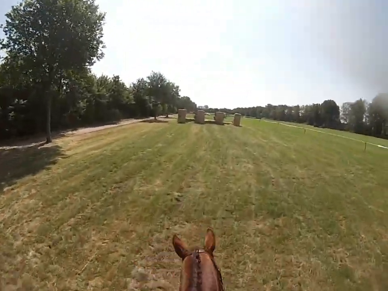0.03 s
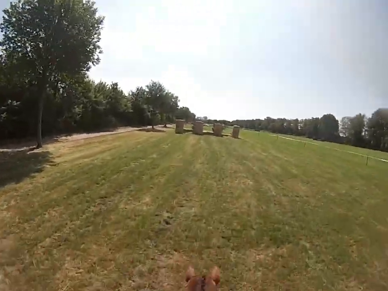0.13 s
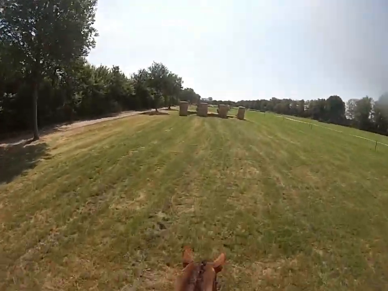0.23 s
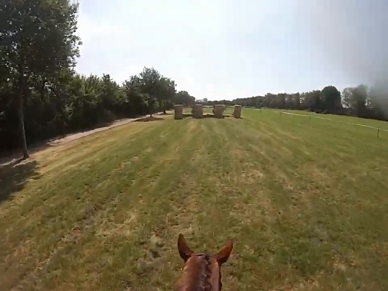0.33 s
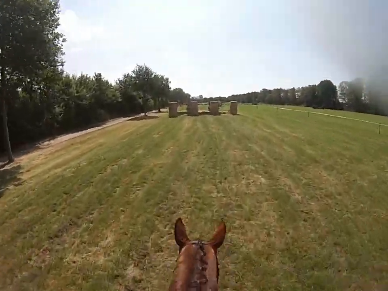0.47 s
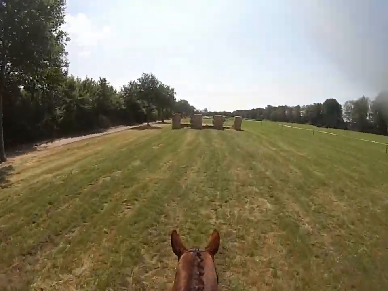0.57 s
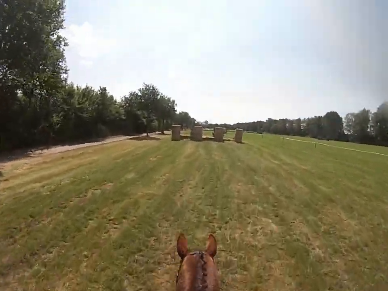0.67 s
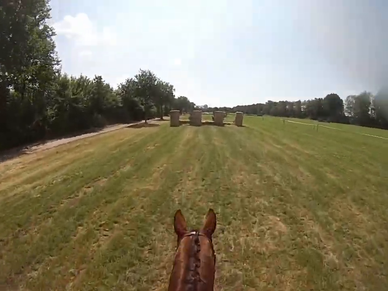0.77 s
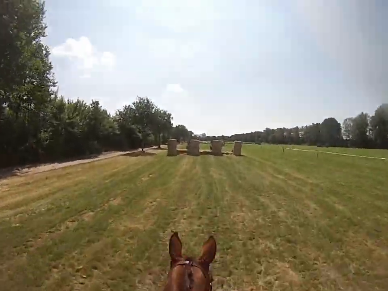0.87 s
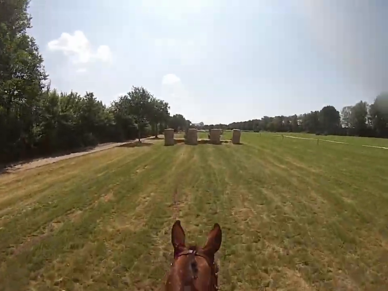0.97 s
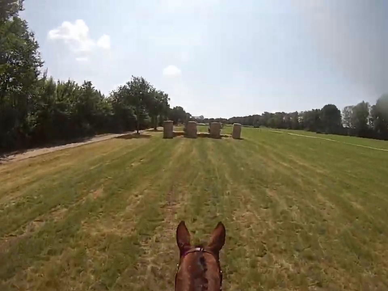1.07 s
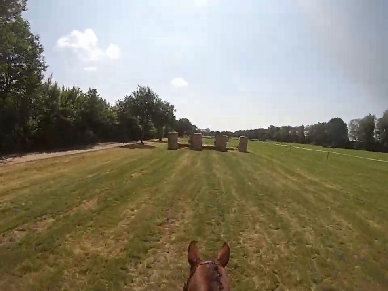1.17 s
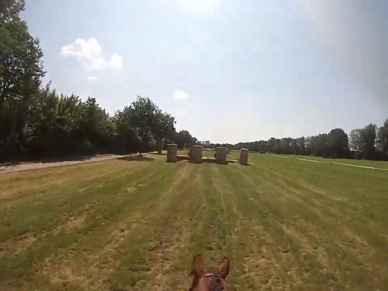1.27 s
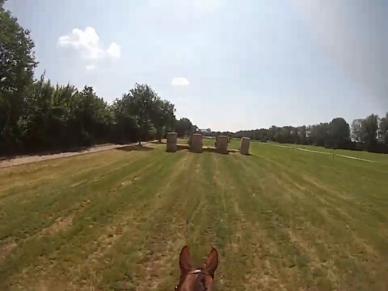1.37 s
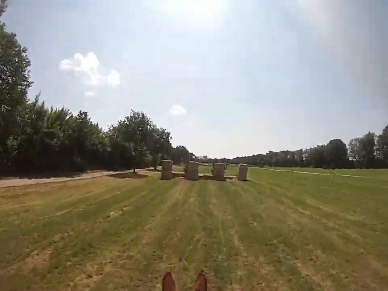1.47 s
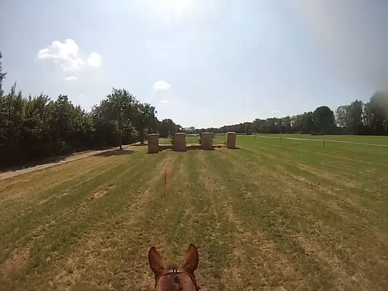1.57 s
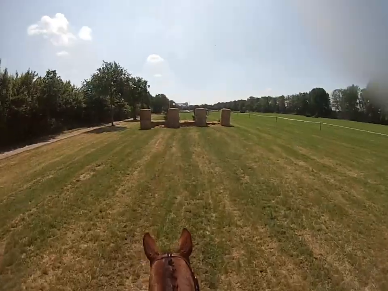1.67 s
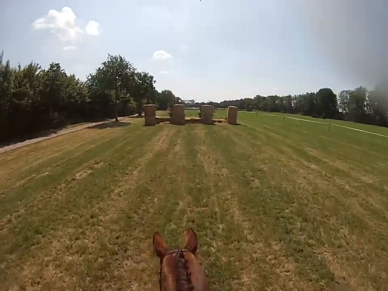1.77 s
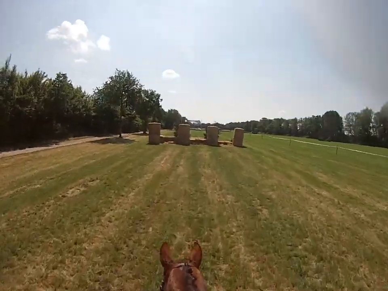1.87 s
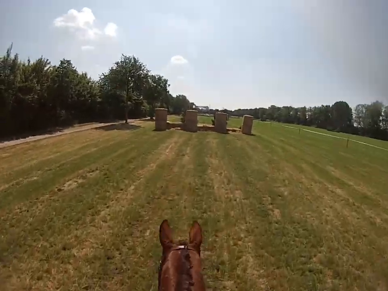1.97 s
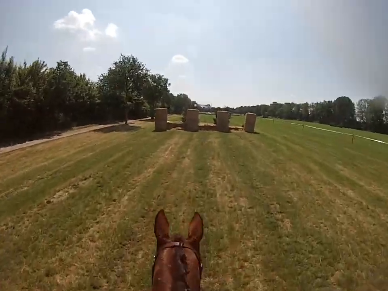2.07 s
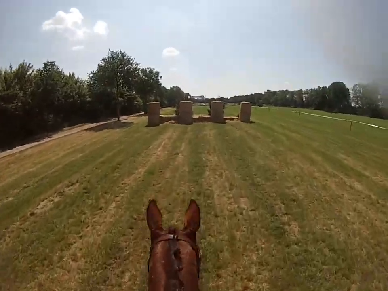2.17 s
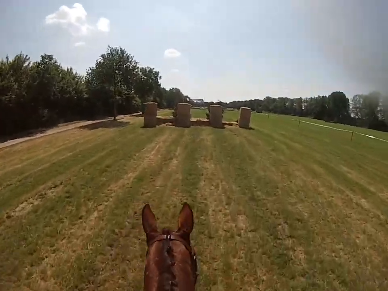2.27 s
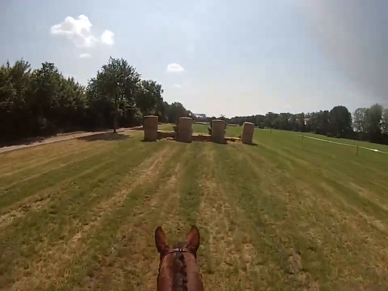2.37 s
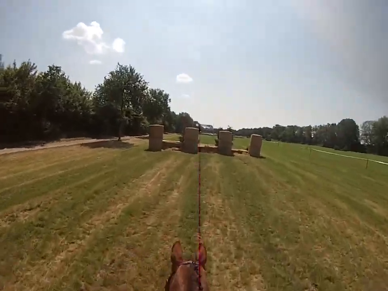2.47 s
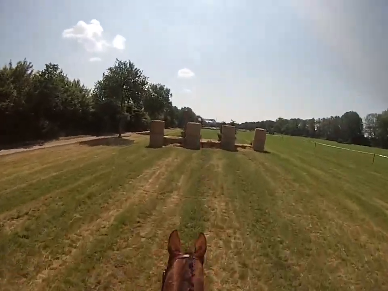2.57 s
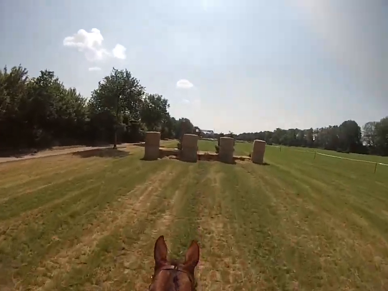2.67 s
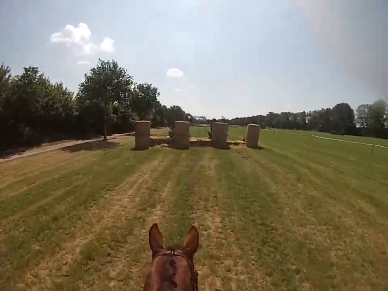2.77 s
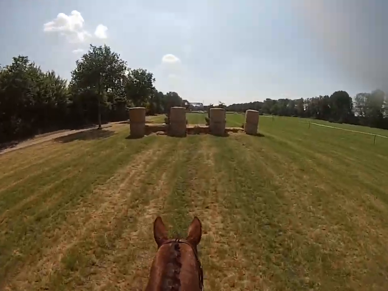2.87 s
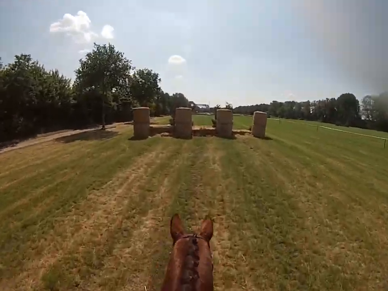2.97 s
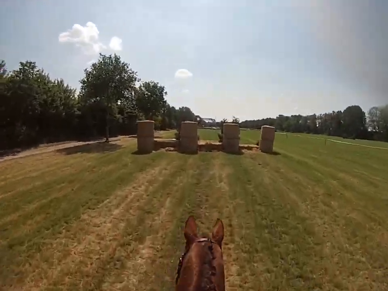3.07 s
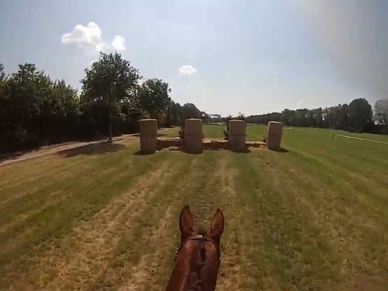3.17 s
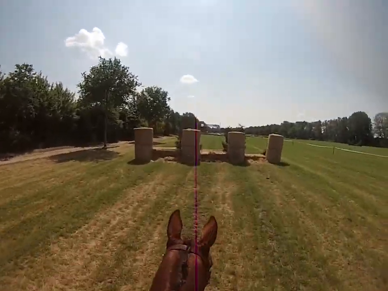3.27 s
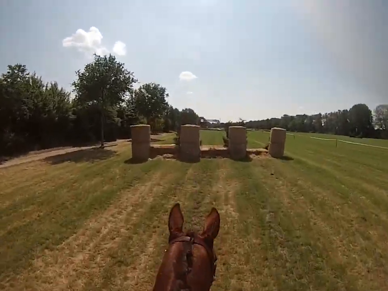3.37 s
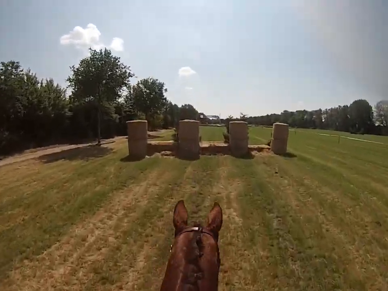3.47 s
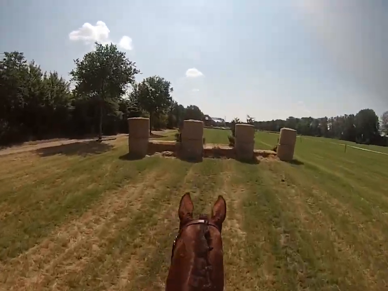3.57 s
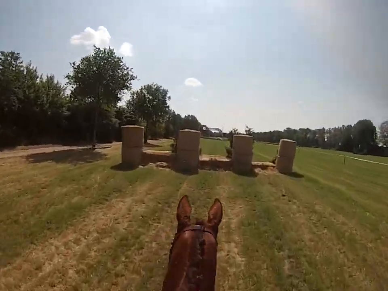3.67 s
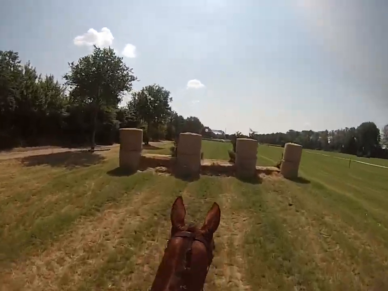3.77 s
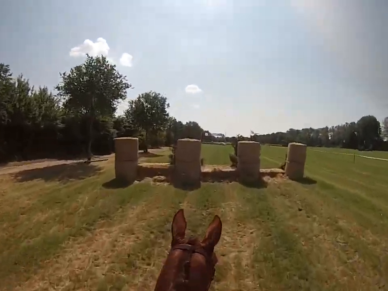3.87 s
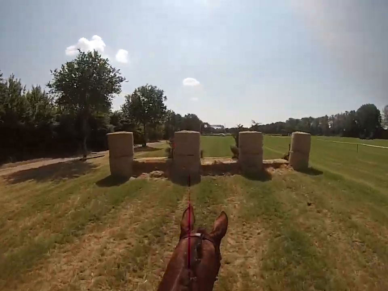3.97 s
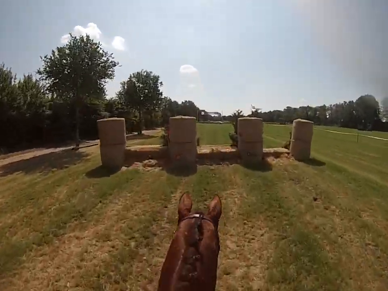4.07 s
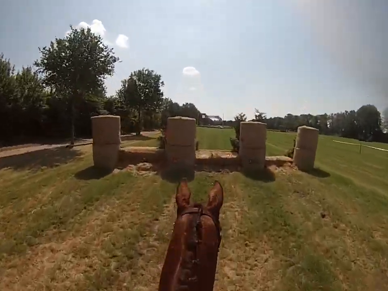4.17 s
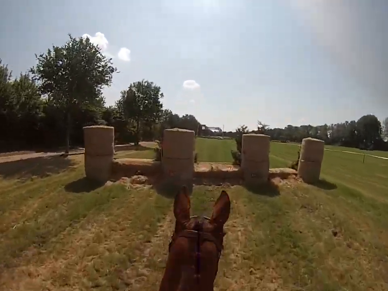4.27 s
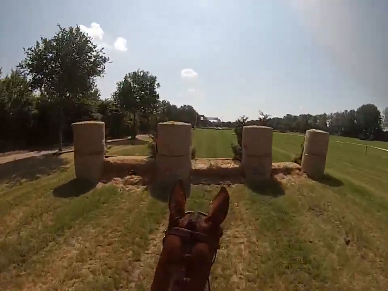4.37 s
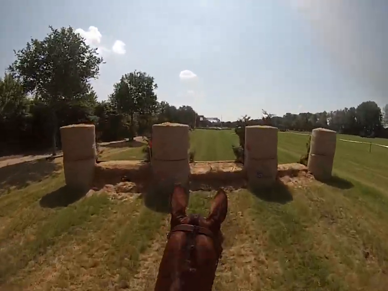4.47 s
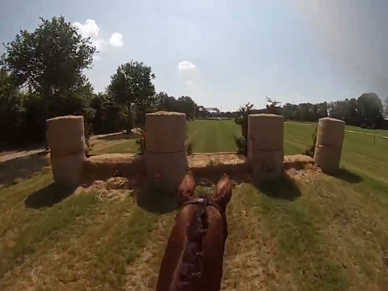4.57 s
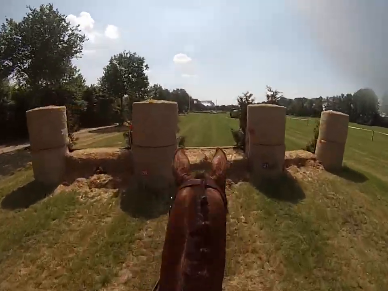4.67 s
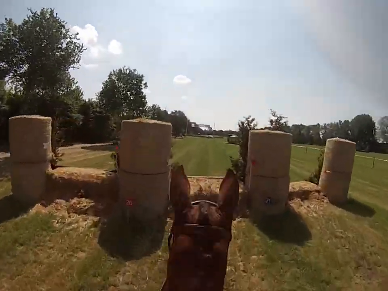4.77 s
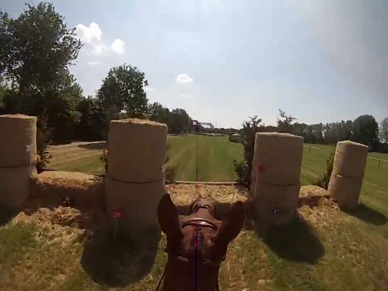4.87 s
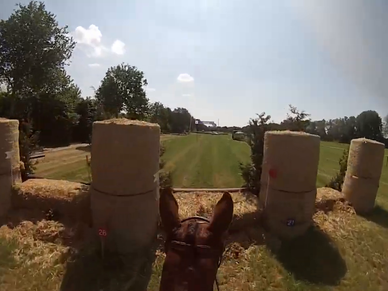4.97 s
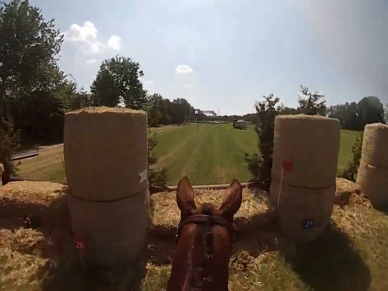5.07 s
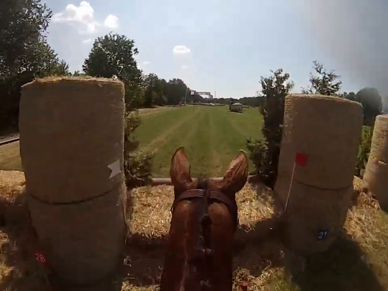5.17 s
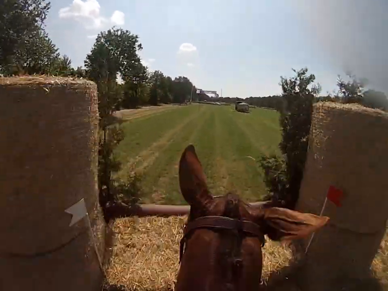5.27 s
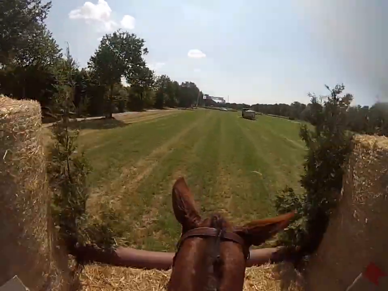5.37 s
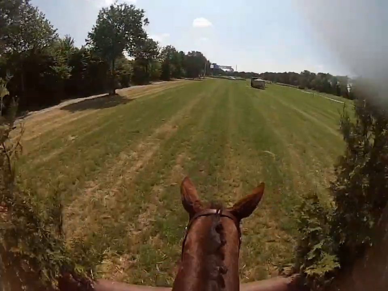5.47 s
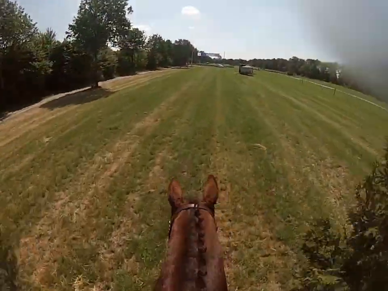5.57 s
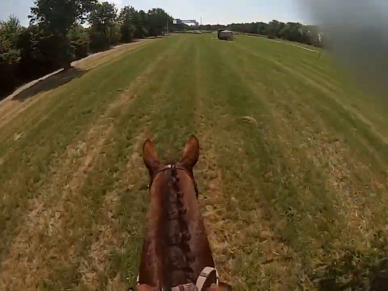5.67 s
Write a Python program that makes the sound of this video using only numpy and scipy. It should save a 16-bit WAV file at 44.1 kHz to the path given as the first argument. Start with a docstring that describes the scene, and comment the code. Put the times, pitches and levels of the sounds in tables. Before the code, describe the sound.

Outdoors on open grass, a cased camera on a rider's helmet hears gusting, slightly boxy wind over faint steady wash. Dull, low hoof thuds and body lurches come in strides about twice a second. Tack scuffs and tiny clicks pass by, a faint knock near 3.75 seconds, then at the straw fence a deep heave with a loud cracking rattle, and a second rattle just after.

```python
"""Air rushes and hisses round a cased camera on the helmet of a rider galloping over grass.
Filtered noise in puffs, gusts and stride swells makes the wind, over a faint even wash.
Hooves and the horse's weight are dull decaying sines; tack scuffs, creaks and clicks.
The camera's mount knocks faintly on the way; at a jump over a straw-bale fence it jolts and
rattles twice, as bursts of crack noise and damped case modes."""
import sys
import numpy as np
from scipy import signal
from scipy.fft import rfft, irfft
from scipy.io import wavfile
from scipy.ndimage import uniform_filter1d

SR = 44100
rng = np.random.default_rng(int(sys.argv[2]) if len(sys.argv) > 2 else 0)


def waveform_to_disk(signal):
    """Save audio, clipped to [-1, 1], as 16-bit WAV at the path in sys.argv[1]."""
    frames = np.transpose(np.atleast_2d(signal))
    scaled = np.clip(frames, -1, 1) * 32767
    samples = np.round(scaled).astype(np.int16)
    wavfile.write(sys.argv[1], SR, samples)


N = 251811
TIME = np.arange(N) / SR
BINS = np.fft.rfftfreq(N, 1 / SR)

# Peaks and dips of the air in the case.
# Each row: frequency in Hz, width in Hz, lift in dB.
CAVITY_RESONANCES = [(1427, 250, 4.5), (1953, 120, 4.5), (2247, 99, -12.5), (2510, 700, 7), (2817, 240, 1),
                     (3104, 104, -8.5), (3457, 830, 6), (3920, 110, -6.5), (4450, 1100, 3.5),
                     (5650, 150, 6.5)]
# Dips and crests of the horse's stride, with the air noise at each.
# Each row: dip in seconds, crest in seconds, buffeting in dB, roar in dB, hiss in dB,
# half-length of the hiss in seconds, whoosh in dB.
STRIDE_CYCLES = [(-.4, 0, -50, -46, -64.5, .06, -60), (.18, .33, -46, -46.5, -67, .13, -59),
                 (.88, 1.08, -47, -46.5, -72, .15, -58), (1.45, 1.648, -43, -44, -51.5, .074, -50.5),
                 (2.0, 2.25, -43, -52, -76, .1, -55.5), (2.58, 2.92, -47, -49, -61.5, .115, -54.5),
                 (3.14, 3.45, -48, -50, -66, .12, -53.5), (3.8, 4.08, -41, -46.5, -70, .13, -53.5),
                 (4.38, 4.62, -42, -45, -61.5, .1, -59), (4.86, 5.09, -37, -42.5, -56.5, .125, -58),
                 (5.36, 5.31, -33, -43, -61, .21, -70)]


def gain_of(db):
    """Decibels to amplitude."""
    return 10 ** (np.asarray(db) / 20)


def evened(x):
    """Scales to an rms of one."""
    return x / np.sqrt(np.mean(x ** 2) + 1e-20)


def add(mix, start_s, sound):
    """Mixes a sound in at start_s, cut at the end of the mix."""
    part = mix[max(round(start_s * SR), 0):][:len(sound)]
    part += sound[:len(part)]


def colour(x, spectrum, lift_db=0):
    """Filters x by a spectrum drawn over log frequency, to an rms of one."""
    hz, db = np.transpose(spectrum)
    shape_db = np.interp(np.log(BINS + 1), np.log(hz), db) + lift_db
    audible = BINS > 10
    return evened(irfft(rfft(x) * gain_of(shape_db) * audible, N))


def wander(rate_hz):
    """Slow random curve of unit rms, up to about rate_hz."""
    lowpass = 1 + (BINS / rate_hz) ** 2
    return evened(irfft(rfft(rng.standard_normal(N)) / lowpass, N))


def turbulence(flutter_db, rate_hz):
    """Noise that comes in puffs as eddies pass; flutter_db is the rms of the level."""
    return rng.standard_normal(N) * gain_of(flutter_db * wander(rate_hz))


def resonance_db(resonances):
    """Sums the peaks and dips of resonances into a response in dB."""
    return sum(db / (1 + (2 * (BINS - hz) / width_hz) ** 2) for hz, width_hz, db in resonances)


def swells(times_s, levels_db, half_lengths_s):
    """Bell-shaped swells whose powers add."""
    bells = np.exp(-((TIME[:, None] - times_s) / half_lengths_s) ** 2)
    return np.linalg.norm(bells * gain_of(levels_db), axis=1)


def gusts():
    """Head wind: each gust rises, holds while its level drifts, and falls away."""
    # Each row: start in seconds, hold in seconds, level in dB, sag in dB per second.
    gust_rows = [(-.1, 0.11, -42, -2), (0.144, 0.73, -44.5, 0), (0.905, 0.33, -36, 20.5),
                 (1.369, 0.37, -53, -24), (1.81, 0.63, -48, 8), (2.593, 0.4, -54.5, -8),
                 (3.23, 0.18, -47.5, 17), (3.47, 0.091, -58, 0), (3.755, 0.18, -52, -34),
                 (4.05, 0.28, -54, -12), (4.326, 0.35, -45, 1.5), (4.85, 0.2, -51, -45),
                 (5.063, .19, -43, 1), (5.255, 0.28, -39.5, 7.5), (5.593, 0.13, -47.5, -2)]
    rise_s, fall_s = 0.064, 0.097
    power = np.zeros(N)
    for start_s, hold_s, db, sag_db_per_s in gust_rows:
        t = TIME - start_s
        rise = np.clip(t / rise_s, 0, 1)
        fall = np.exp(-np.maximum(t - hold_s, 0) / fall_s)
        level = gain_of(db - sag_db_per_s * np.clip(t, 0, hold_s))
        power += (rise * fall * level) ** 2
    return np.sqrt(power)


def wind():
    """Gusts rush through the case's resonances; air buffets in dips, roars, whooshes and hisses at crests."""
    # Spectra of the five air noises, rush and whoosh before the case's resonances.
    # Each row: frequency in Hz, relative density in dB per Hz.
    rush_spectrum = [(150, -4.5), (400, -2.5), (650, -0.5), (950, -7), (1450, 1.5), (2700, -3), (3550, -9),
                     (4000, -16), (5500, -22), (7500, -26.5), (10000, -99)]
    hiss_spectrum = [(1500, -20), (4000, -4), (5200, -2), (7200, -1), (8500, -2.5), (9300, 1), (10500, -13),
                     (13000, -27)]
    buffet_spectrum = [(10, 23), (24, 3), (42, 15), (68, 3.5), (105, -3), (250, -69)]
    roar_spectrum = [(40, -14), (78, 1.5), (170, 0.5), (280, -4), (420, -16.5), (700, -18), (1500, -18),
                     (4000, -94)]
    whoosh_spectrum = [(150, -16), (300, -3), (430, 0), (650, 6.5), (950, -3), (1400, -4.5), (2200, -4),
                       (4000, -44), (8000, -55)]
    calm_rush_db, calm_buffet_db, calm_roar_db = -60, -51, -51
    # half-lengths of the swells
    buffet_s, roar_s, whoosh_s = 0.29, 0.19, 0.22

    dip_s, crest_s, buffet_db, roar_db, hiss_db, hiss_s, whoosh_db = np.transpose(STRIDE_CYCLES)
    case_db = resonance_db(CAVITY_RESONANCES)

    rush_level = np.hypot(gusts(), gain_of(calm_rush_db))
    rush = rush_level * colour(turbulence(flutter_db=1.42, rate_hz=77), rush_spectrum, case_db)

    hiss_level = swells(crest_s, hiss_db, hiss_s)
    hiss = hiss_level * colour(turbulence(flutter_db=2.5, rate_hz=21), hiss_spectrum)

    buffet_level = np.hypot(swells(dip_s, buffet_db, buffet_s), gain_of(calm_buffet_db))
    buffet = buffet_level * colour(turbulence(flutter_db=3.5, rate_hz=35), buffet_spectrum)

    roar_level = np.hypot(swells(crest_s, roar_db, roar_s), gain_of(calm_roar_db))
    roar = roar_level * colour(turbulence(flutter_db=1.5, rate_hz=7.8), roar_spectrum)

    whoosh_level = swells(crest_s, whoosh_db, whoosh_s)
    whoosh = whoosh_level * colour(turbulence(flutter_db=2.0, rate_hz=14), whoosh_spectrum, case_db)
    return rush + hiss + buffet + roar + whoosh


def background():
    """A faint even wash of steady noise under everything."""
    # Spectrum of the wash. Each row: frequency in Hz, relative density in dB per Hz.
    wash_spectrum = [(100, 0), (600, -3), (1400, -3), (3000, -10), (4500, -14.5), (7500, -19), (10000, -21),
                     (12300, -18.5), (13300, -26), (14400, -32)]
    return gain_of(-58.5) * colour(rng.standard_normal(N), wash_spectrum)


def thud(hz, swell_s):
    """A low push whose swell peaks at swell_s and dies within a few cycles."""
    t = np.arange(SR // 4) / SR
    u = t / swell_s
    return u ** 2 * np.exp(2 * (1 - u)) * np.sin(2 * np.pi * hz * t)


def gallop():
    """Hooves thump the turf and the horse's weight lurches through the rider; the leap heaves hardest."""
    # Lurches of the strides and the jump. Each row: start in seconds, peak in dB, pitch in Hz.
    lurches = [(0.119, -41, 36), (0.2, -28.5, 29.4), (0.373, -35.5, 38.5), (.6, -39.5, 42.3),
               (0.785, -33.5, 45.4), (.885, -32, 32.4), (0.976, -22, 35.7), (1.31, -32, 38),
               (1.357, -27, 38), (1.412, -26, 33.7), (1.562, -28, 46.5), (1.658, -31.5, 35),
               (1.972, -28, 35), (2.935, -35, 41.5), (3.114, -40, 36.2), (3.257, -34, 47.5),
               (3.45, -35, 38.2), (3.53, -41, 42), (3.746, -33.5, 56), (3.78, -31, 32.2),
               (3.834, -24.5, 39.7), (4.341, -26.5, 27.4), (4.676, -24.5, 48.3), (4.73, -30, 41),
               (4.816, -21, 31.8), (4.893, -23.5, 35), (5.029, -30.5, 41.5), (5.212, -32, 35),
               (5.306, -19.5, 74), (5.312, -7.5, 34.2), (5.386, -24, 42), (5.49, -29.5, 35.5)]
    # Separate hoof strikes on the turf, strong and faint.
    # Each row: start in seconds, peak in dB, pitch in Hz.
    placed_strikes = [(0.401, -37, 140), (.465, -36, 149), (0.599, -39.5, 148), (0.797, -38.5, 135),
                      (0.966, -30.5, 121), (1.071, -40, 150), (1.369, -41, 129), (1.672, -45, 133),
                      (1.965, -37, 140), (2.599, -32.5, 123), (2.91, -41, 185), (3.436, -38.5, 150),
                      (3.7516, -28, 214), (3.853, -33.5, 136), (4.166, -37, 141), (4.282, -32.5, 105),
                      (4.672, -31.5, 101), (4.839, -33, 119), (4.991, -30.5, 120), (5.097, -36, 139),
                      (5.154, -36, 159), (5.212, -32.5, 118), (5.283, -19, 122), (5.453, -23.5, 92.5),
                      (5.578, -30, 140)]
    lurch_cycles = 0.72  # swell time as a share of a cycle
    beat_s, beat_db, beat_hz = 0.072, -44.5, 126.5

    out = np.zeros(N)
    for start_s, db, hz in lurches:
        add(out, start_s, gain_of(db) * thud(hz, lurch_cycles / hz))

    # four faint footfalls from each dip, scattered in time, level and pitch
    scattered_strikes = []
    for dip_s, *_ in STRIDE_CYCLES:
        if dip_s <= 0:
            continue
        for beat in range(4):
            a, b, c = rng.standard_normal(3)
            start_s = dip_s + beat * beat_s + 0.01163 * a
            scattered_strikes.append((start_s, beat_db + 2.0 * b, beat_hz * np.exp(0.2 * c)))
    for start_s, db, hz in [*placed_strikes, *scattered_strikes]:
        add(out, start_s, gain_of(db) * thud(hz, swell_s=0.0053))
    return out


def tack():
    """Leather and cloth catch, then slide to rest in a short grainy rub that sticks and slips."""
    # Rubs of the tack, level ahead of a common lift and the catch.
    # Each row: start in seconds, level in dB, time to catch in seconds, decay time in seconds.
    scuffs = [(.965, -45, .004, 0.059), (1.545, -39.5, .004, 0.012), (1.643, -31, 0.019, 0.023),
              (1.676, -30.5, 0.008, 0.01), (2.399, -36.5, 0.014, 0.015), (3.318, -39.5, 0.021, 0.027),
              (3.91, -42.5, 0.023, 0.049), (4.2834, -37, 0.0015, 0.018), (4.649, -24, 0.024, 0.018),
              (4.69, -34, 0.007, 0.012), (4.947, -28.5, 0.0053, 0.016), (4.985, -32, 0.021, 0.053),
              (5.195, -24.5, 0.016, 0.022), (5.23, -27.5, 0.00085, 0.0043), (5.318, -30, 0.011, 0.012)]
    # Rub before the case's resonances. Each row: frequency in Hz, relative density in dB per Hz.
    rub_spectrum = [(300, -41), (950, -6), (1450, 5.5), (2700, 4), (3600, 1.5), (4200, -8.5), (7500, -19.5),
                    (10000, -75)]
    lift_db = 1.5
    t = np.arange(SR // 4) / SR
    stroke = np.zeros(N)
    for start_s, db, catch_s, decay_s in scuffs:
        add(stroke, start_s, gain_of(db) * (1 - np.exp(-t / catch_s)) * np.exp(-t / decay_s))
    slips = gain_of(2.5 * wander(rate_hz=150))
    grains = slips * turbulence(flutter_db=4.0, rate_hz=1700)
    return gain_of(lift_db) * stroke * colour(grains, rub_spectrum, resonance_db(CAVITY_RESONANCES))


def mount(crack_t60_s=0.015, contact_s=0.00039):
    """Each contact cracks and rings the plastic case; quick runs of them make a rattle."""
    # Contacts in the camera mount. Each row: start in seconds, ring in dB, crack in dB,
    # corner in Hz above which the blow excites modes less.
    knocks = [(0.971, -37, -50, 1000), (3.7514, -38, -54, 500), (3.7556, -26.5, -51, 520),
              (3.7602, -26.5, -52, 560), (5.2829, -15.5, -11.5, 9000), (5.285, -18, -12, 1500),
              (5.2898, -20.5, -30, 2500), (5.291, -13.5, -25, 1910), (5.2998, -18.5, -22, 2200),
              (5.447, -15.5, -20, 5000), (5.4498, -18, -21, 5500), (5.4545, -20, -21, 6000),
              (5.4573, -21, -24, 5500), (5.4596, -18.5, -27, 5500), (5.4651, -20, -28, 4000),
              (5.4688, -16, -20, 6000)]
    # Modes of case and mount, before the choke. Each row: frequency in Hz, level in dB, t60 in seconds.
    case_modes = [(260, -12, 0.14), (552, -5.5, 0.032), (655, -3, 0.029), (803, -9, 0.1), (890, -9, 0.048),
                  (1038, -6, 0.043), (1197, -3.5, 0.04), (1277, -2, 0.07), (1373, -11, 0.033),
                  (1990, -5.5, 0.057), (2390, -15.5, 0.029), (2790, -12, 0.034), (3590, -13.5, 0.024),
                  (4170, -10, 0.024), (4600, -9, 0.021), (5420, -17, 0.024), (7350, -19, 0.01)]
    # Crack of a contact. Each row: frequency in Hz, relative density in dB per Hz.
    crack_spectrum = [(200, 5.5), (1200, 13.5), (1900, 0), (2400, 2), (3100, 2), (4300, -3.5), (5600, -3),
                      (6600, -14), (7700, -13), (9000, -36), (14000, -31)]
    # Pitches at which the case wall moves less. Each row: frequency in Hz, width in Hz, lift in dB.
    dead_bands = [(443, 53, -3.5), (1710, 200, -8.5), (2190, 130, -4), (3110, 200, -11), (6600, 910, -4)]
    settle_s = 0.008

    t = np.arange(SR // 12) / SR
    rise = 1 - np.exp(-(t / contact_s) ** 2)
    # friction chokes the ringing as the joint seats again
    choke = np.exp(-(t / settle_s) ** 2)
    modes = np.array([gain_of(db - 60 * t / t60_s) * np.sin(2 * np.pi * hz * t)
                      for hz, db, t60_s in case_modes])
    mode_hz = np.transpose(case_modes)[0]

    out, pressure = np.zeros(N), np.zeros(N)
    for start_s, ring_db, crack_db, corner_hz in knocks:
        # a soft blow reaches mainly the low modes
        reach = 1 / np.hypot(1, (mode_hz / corner_hz) ** 2)
        add(out, start_s, gain_of(ring_db) * rise * choke * (reach @ modes))
        add(pressure, start_s, gain_of(crack_db - 60 * t / crack_t60_s) * rise)
    out += pressure * colour(rng.standard_normal(N), crack_spectrum)
    return irfft(rfft(out) * gain_of(resonance_db(dead_bands)), N)


def buckles(contact_s=0.00011, snap_db=-5, snap_t60_s=0.0092):
    """Loose hardware on the bridle clicks with a dry snap and a thin ring damped by its straps."""
    # Ticks of buckles and bit. Each row: start in seconds, level in dB.
    ticks = [(1.309, -46), (1.309, -35), (3.7425, -35), (3.7444, -33)]
    # Modes of the hardware. Each row: frequency in Hz, level in dB, t60 in seconds.
    buckle_modes = [(1320, -7, 0.022), (1960, -5, 0.009), (2330, 0, 0.011), (3280, -8, 0.0082),
                    (5760, -7, 0.0042)]
    # Snap of metal on metal. Each row: frequency in Hz, relative density in dB per Hz.
    snap_spectrum = [(300, -5), (1200, 2), (3400, -5), (4400, -10), (6000, -6), (8000, -13), (10000, -35)]
    t = np.arange(SR // 20) / SR
    rise = 1 - np.exp(-t / contact_s)
    ring = np.zeros(len(t))
    for k, (hz, db, t60_s) in enumerate(buckle_modes):
        # neighbouring modes swing opposite ways
        ring += (-1) ** k * gain_of(db - 60 * t / t60_s) * np.sin(2 * np.pi * hz * t)

    out, pressure = np.zeros(N), np.zeros(N)
    for start_s, db in ticks:
        add(out, start_s, gain_of(db) * rise * ring)
        add(pressure, start_s, gain_of(db + snap_db - 60 * t / snap_t60_s) * rise)
    return out + pressure * colour(rng.standard_normal(N), snap_spectrum)


def creaks():
    """Stretched leather slips for a few milliseconds: a sine with jittered pitch, a gritty squeak."""
    # Short creaks. Each row: start in seconds, peak in dB, mean pitch in Hz.
    creak_rows = [(1.678, -35, 2890), (1.685, -30.5, 2550), (4.663, -35, 2560), (5.001, -38, 2640),
                  (5.048, -33, 2550)]
    swell_s = 0.0035
    t = np.arange(SR // 20) / SR
    u = t / swell_s
    out = np.zeros(N)
    for start_s, db, hz in creak_rows:
        jitter = evened(uniform_filter1d(rng.standard_normal(len(t)), size=24))
        turns = np.cumsum(hz * (1 + 0.062 * jitter)) / SR
        add(out, start_s, gain_of(db) * u * np.exp(1 - u) * np.sin(2 * np.pi * turns))
    return out


def scene():
    """One microphone in the case feeds both channels."""
    mono = wind() + background() + gallop() + tack() + mount() + buckles() + creaks()
    return np.array([mono, mono])


def record(dry):
    """The recorder's band limit: a linear-phase low-pass."""
    edge_hz = 14450
    lowpass = signal.firwin(511, edge_hz, window=("kaiser", 9), fs=SR)
    return signal.oaconvolve(dry, lowpass[None], "same")


dry = scene()
out = record(dry)
waveform_to_disk(out)
```